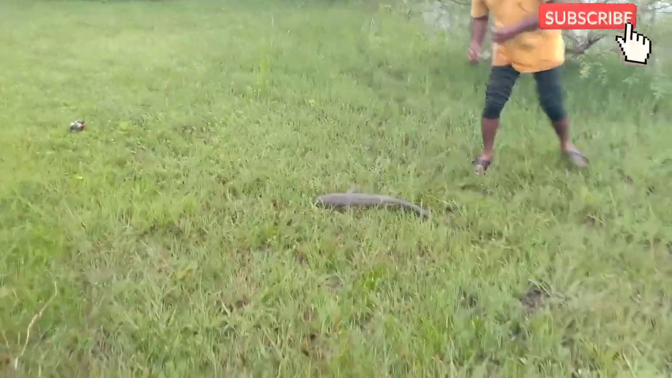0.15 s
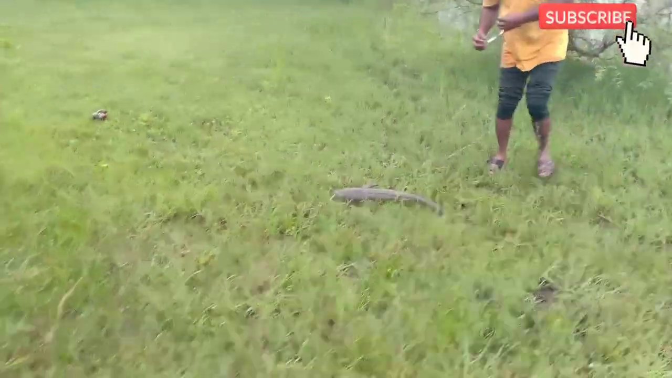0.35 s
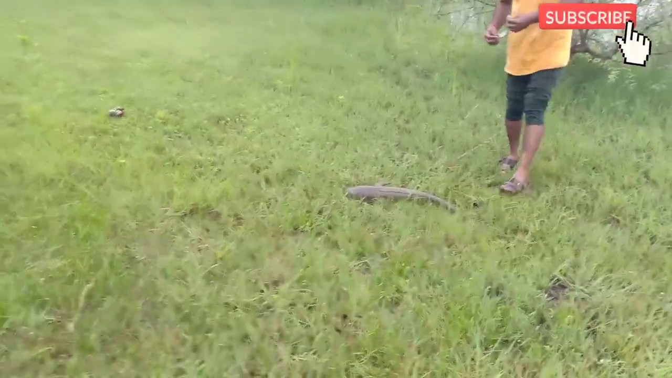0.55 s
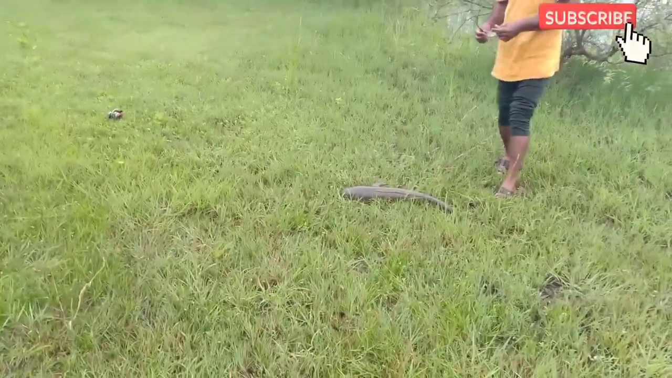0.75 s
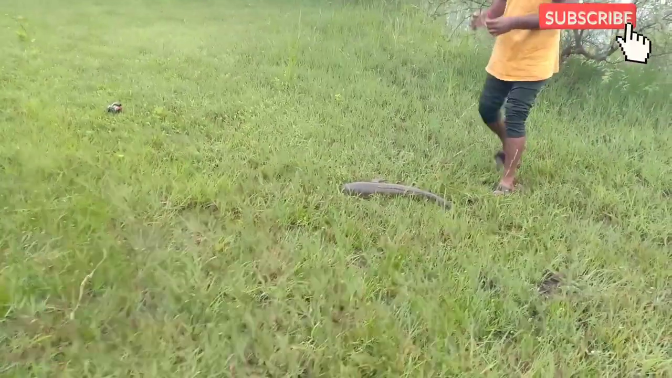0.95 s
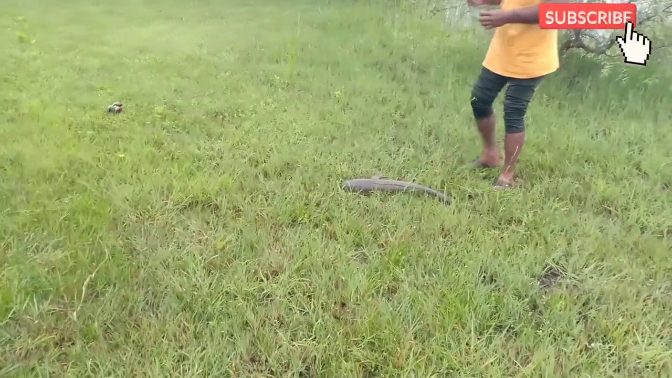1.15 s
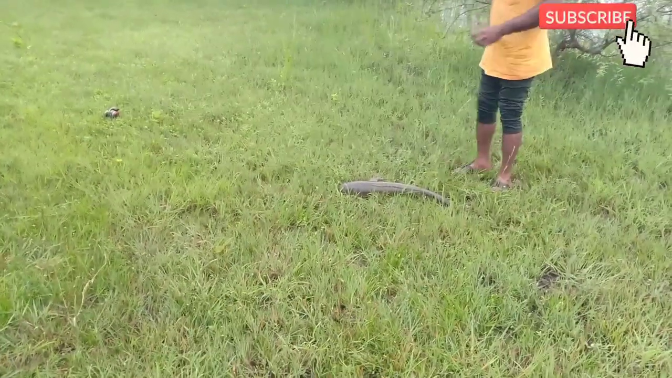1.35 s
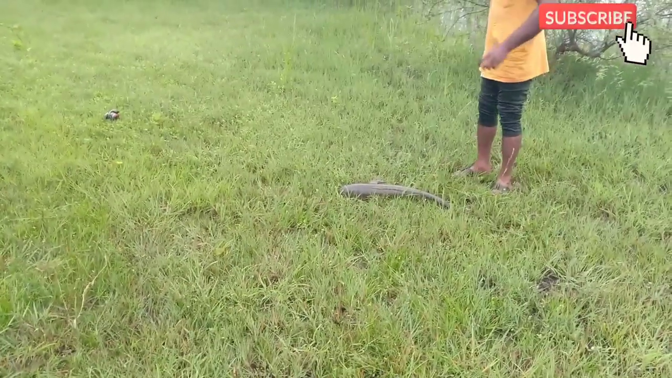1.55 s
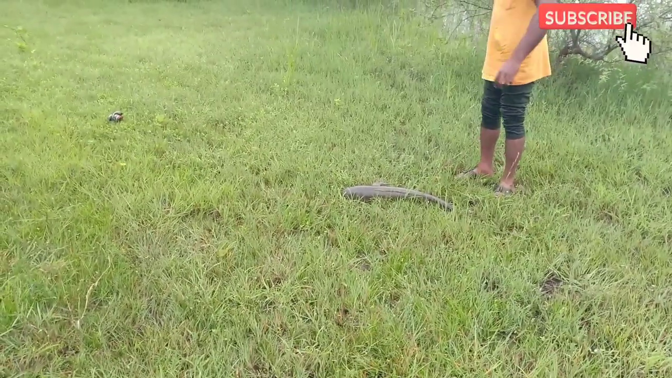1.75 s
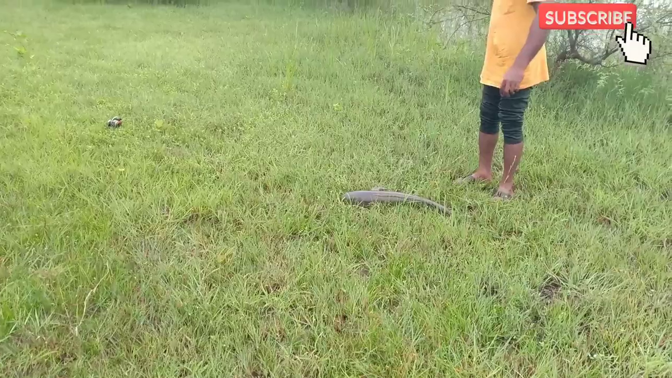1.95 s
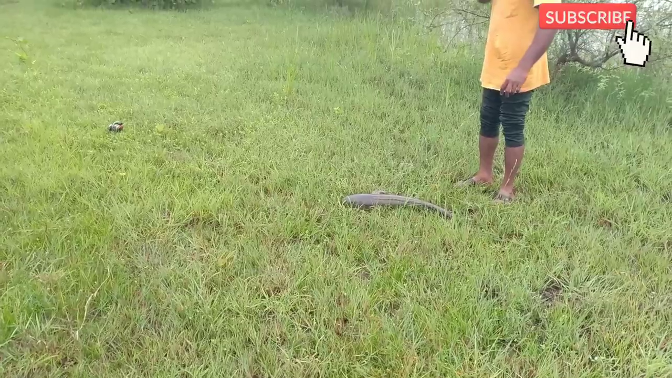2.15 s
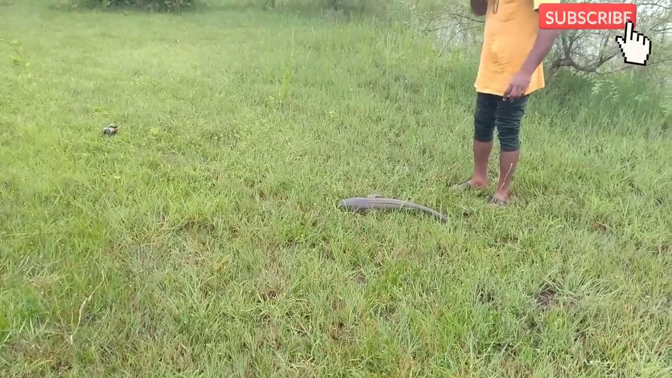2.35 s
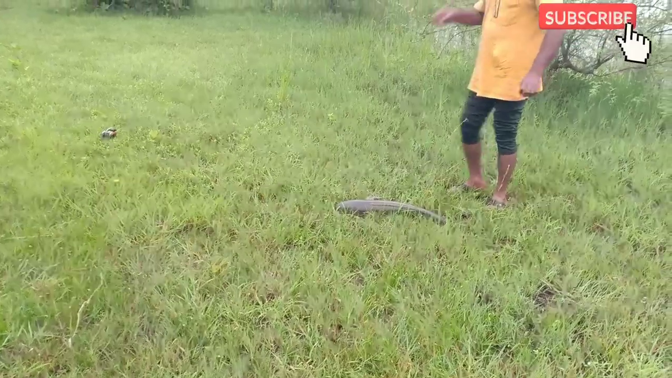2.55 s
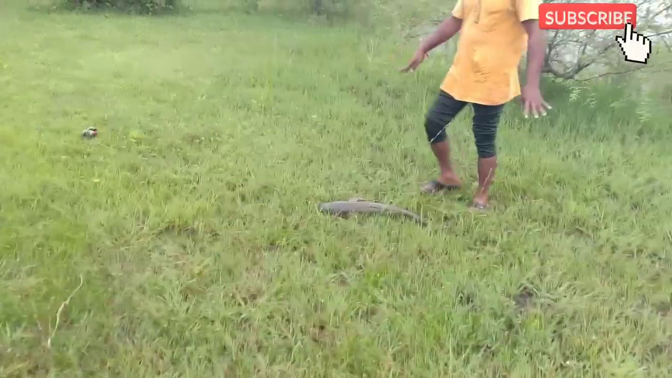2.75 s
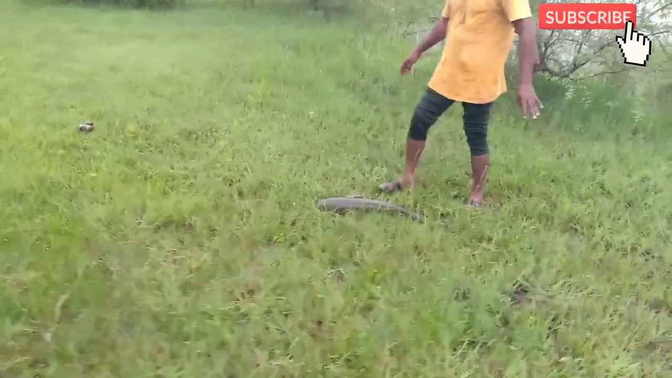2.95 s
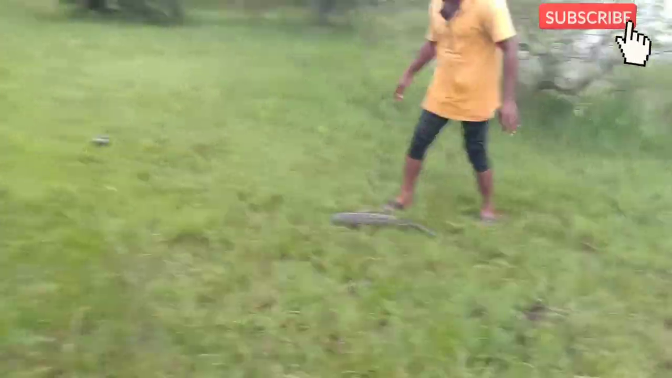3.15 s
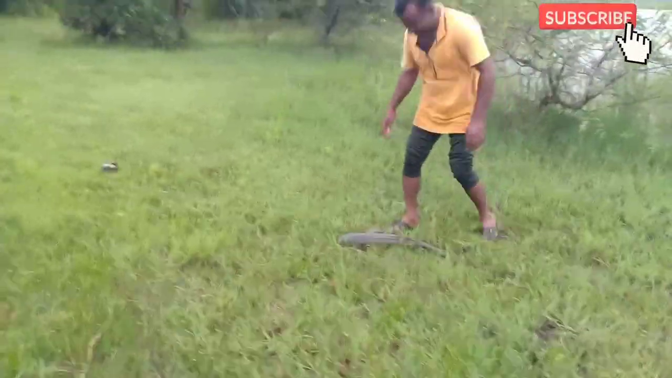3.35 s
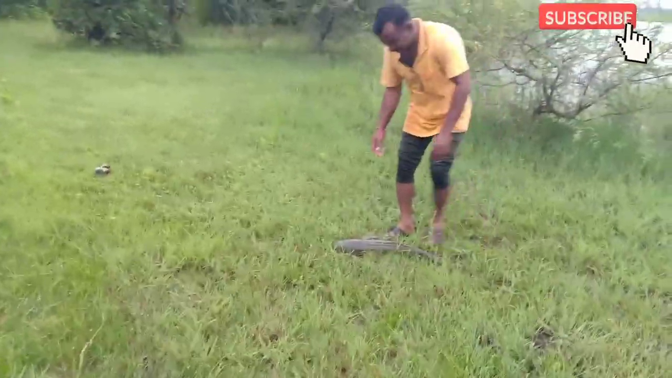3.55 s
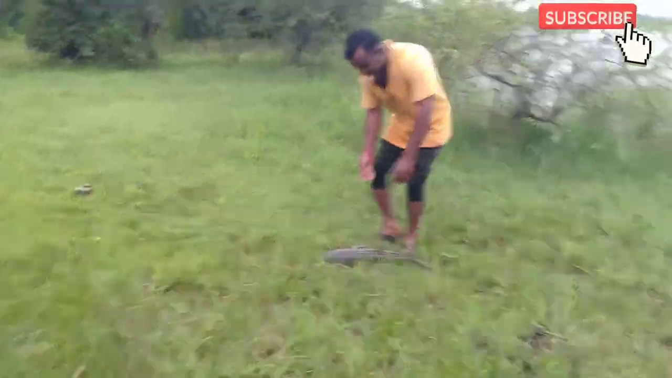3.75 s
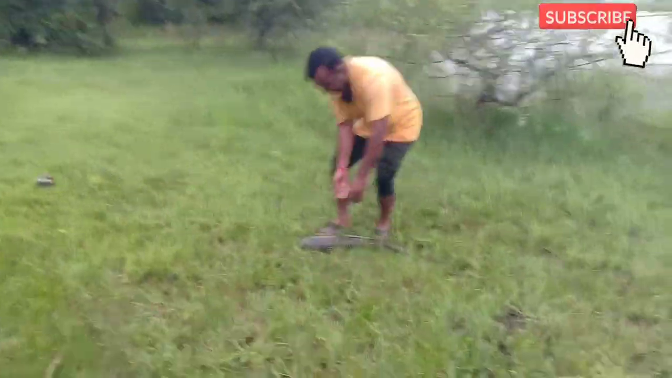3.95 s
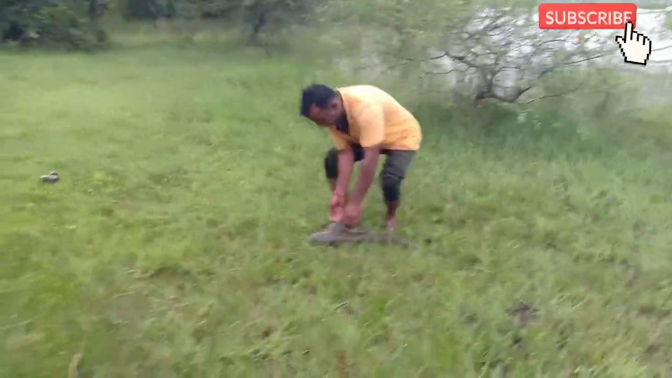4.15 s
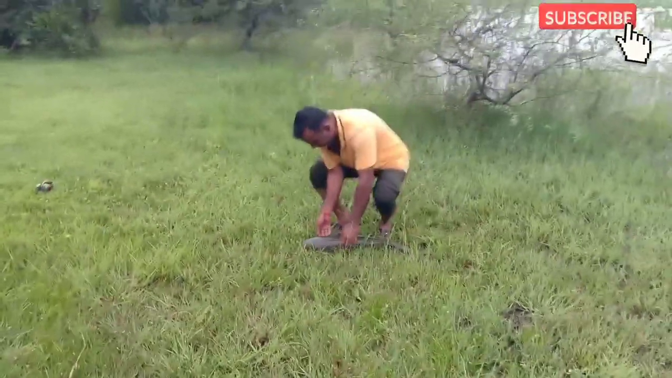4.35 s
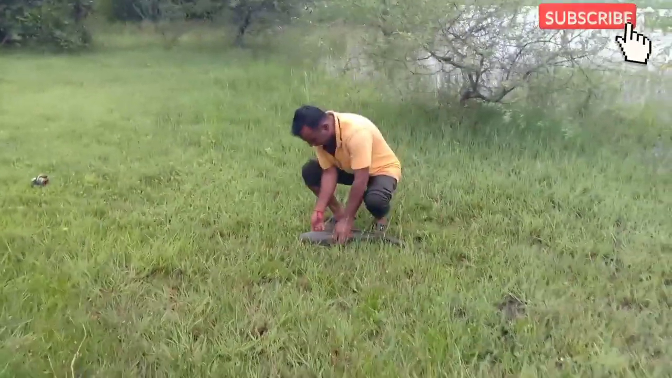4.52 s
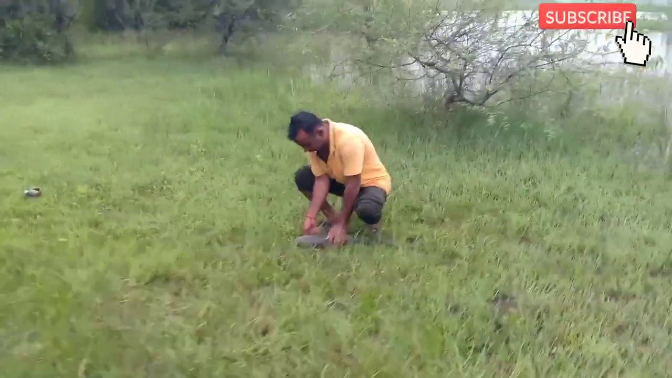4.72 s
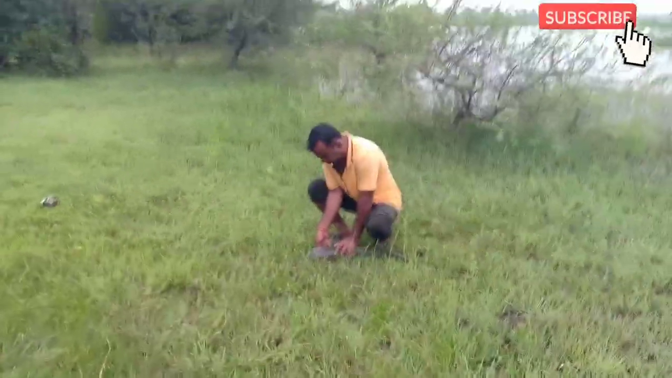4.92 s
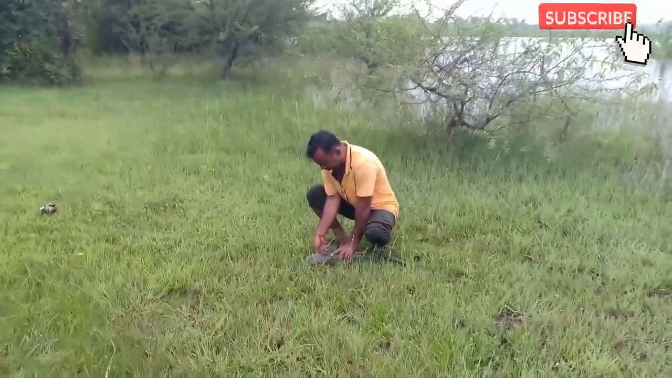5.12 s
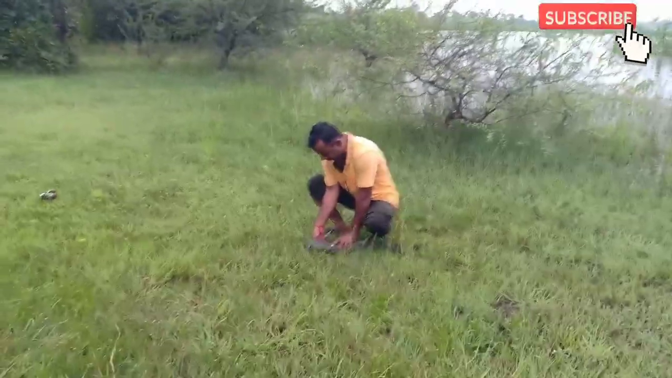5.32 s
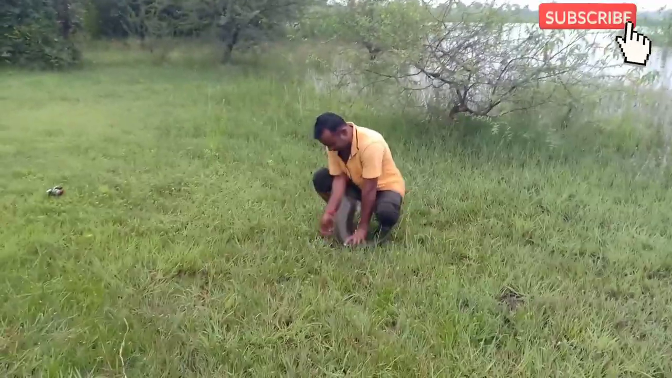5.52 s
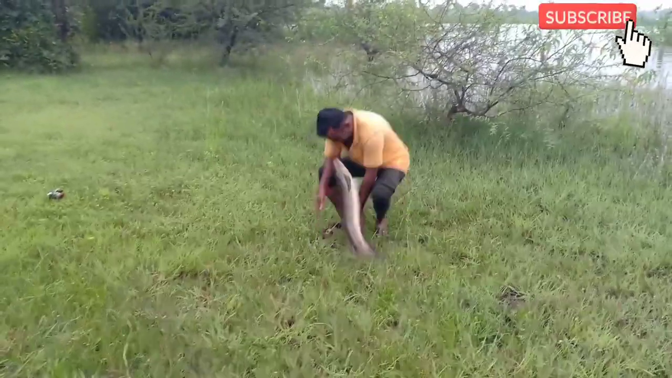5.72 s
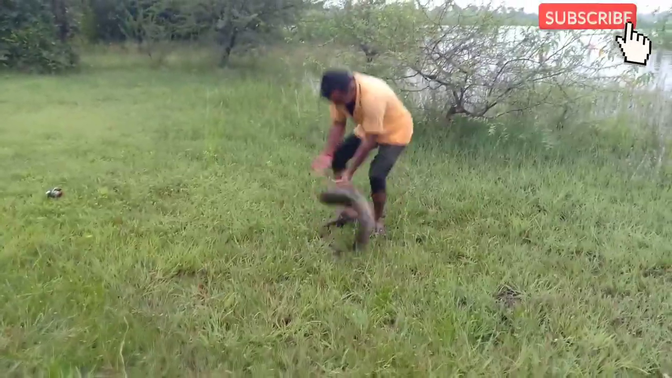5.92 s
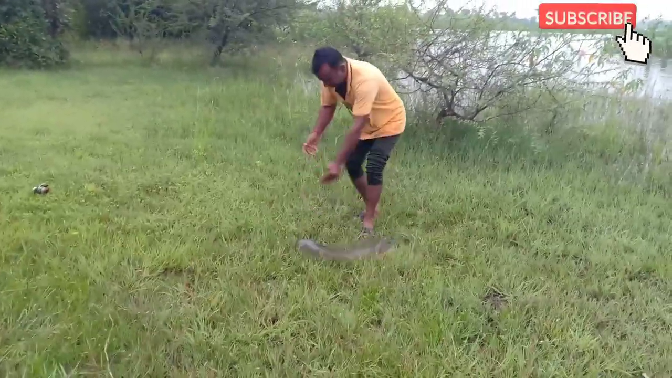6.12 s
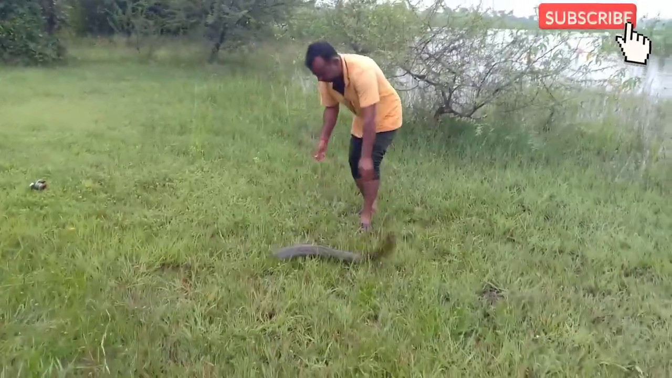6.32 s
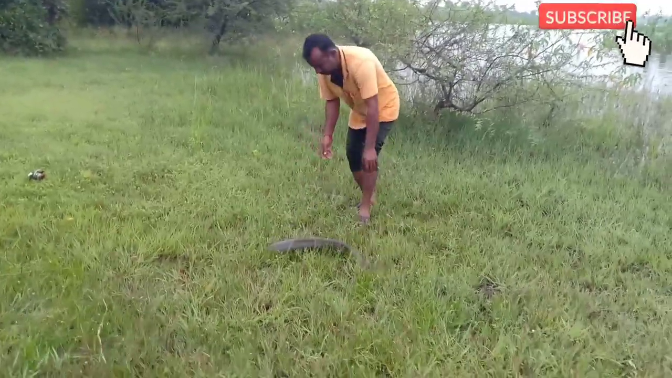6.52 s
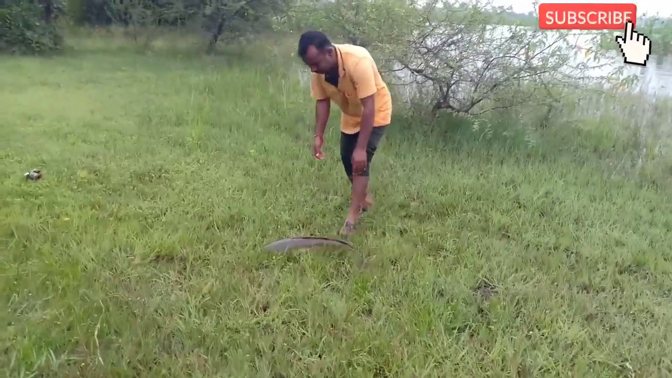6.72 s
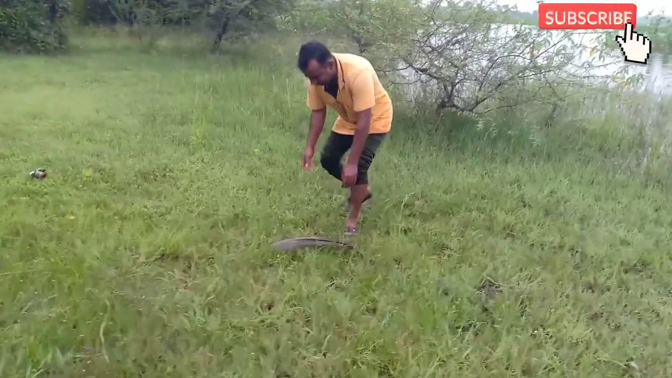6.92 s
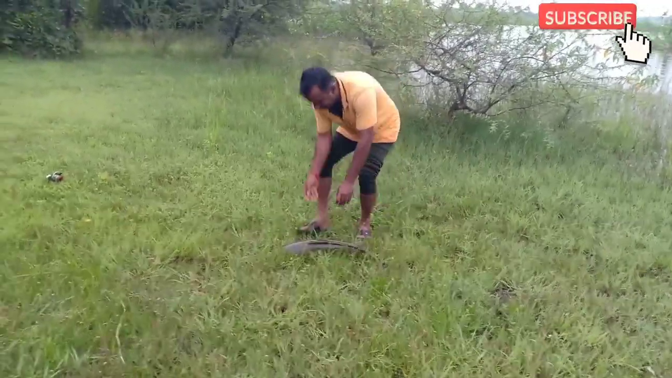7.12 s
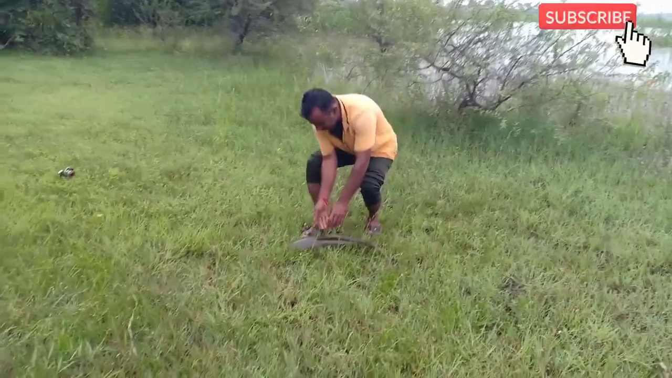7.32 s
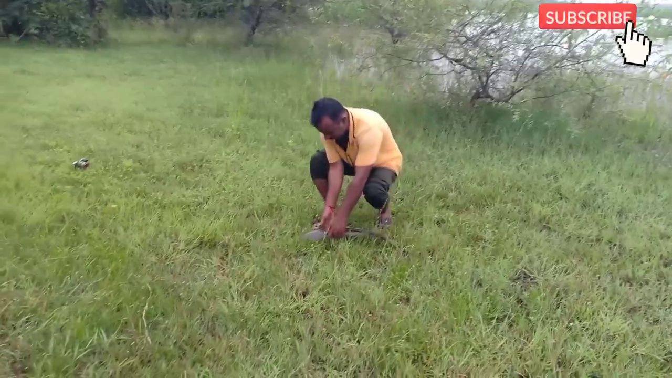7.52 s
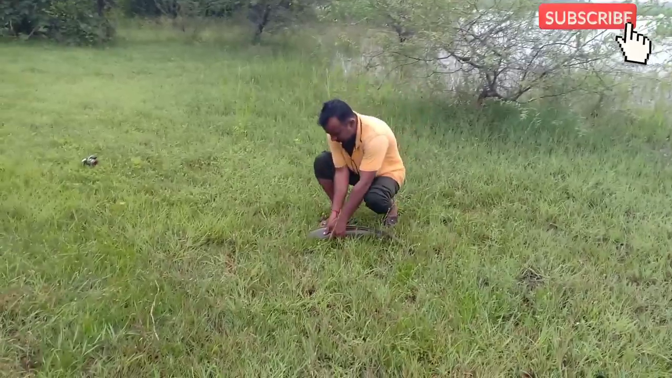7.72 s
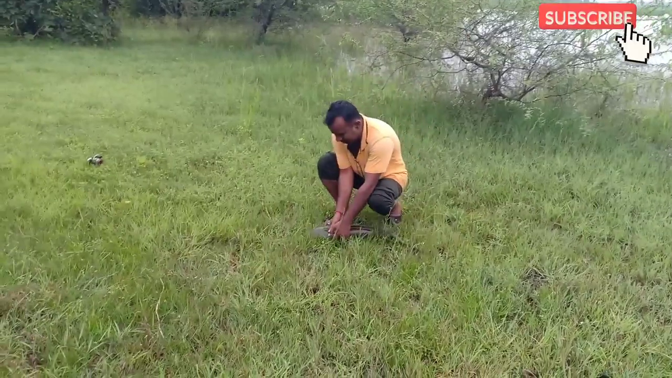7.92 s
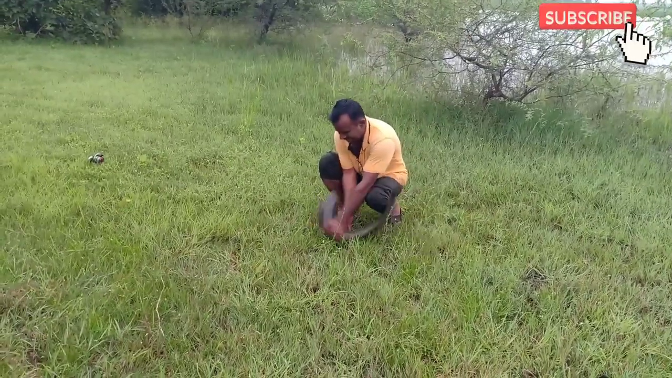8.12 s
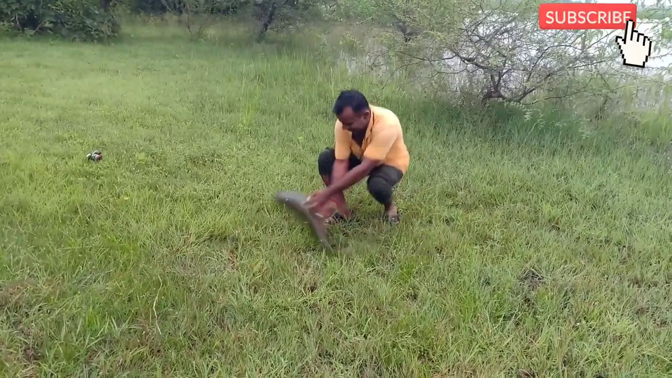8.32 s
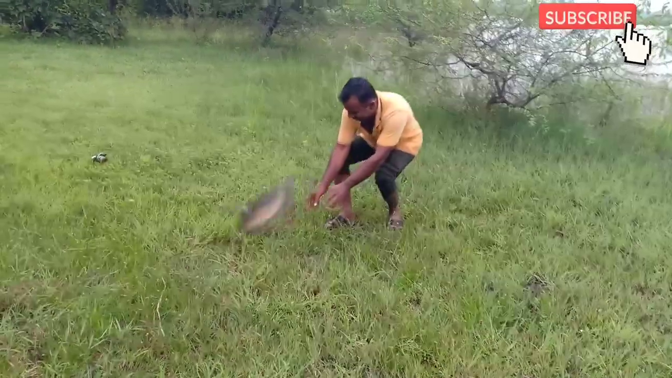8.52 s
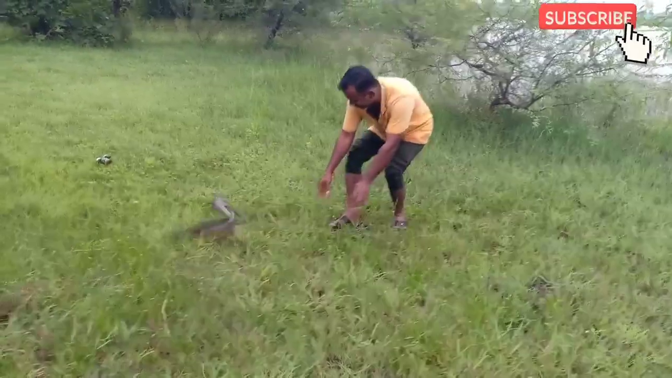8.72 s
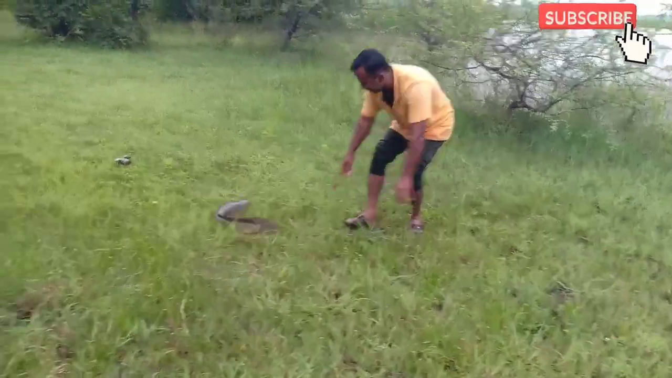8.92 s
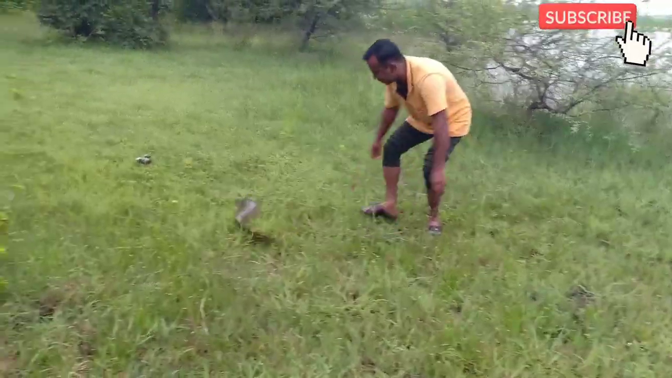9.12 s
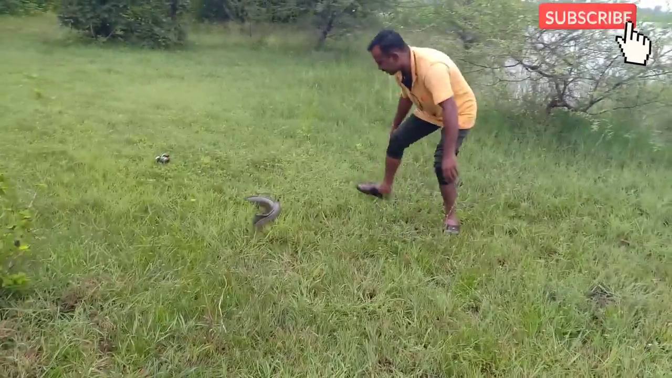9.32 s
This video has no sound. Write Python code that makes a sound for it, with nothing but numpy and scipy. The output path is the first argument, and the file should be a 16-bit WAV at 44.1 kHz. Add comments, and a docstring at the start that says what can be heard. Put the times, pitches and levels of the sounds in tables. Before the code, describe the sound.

A quiet waterside meadow: faint hiss of open air, bird trills, falling whistles and far doves to the left. Someone takes a few dull steps on soft earth, brushing grass and cracking stems. Then a heavy wet fish smacks abruptly, drops and writhes with crunchy, splashy rustles. Birds fill the pause before a second cluster of sharp wet slaps and flops, ending in light grass swishes. Open stereo pickup, little echo, slaps far louder than everything else.

```python
"""Footsteps, rustling grass and snapping stems come first, among bird chatter, whistles and far doves. About
5.5 s in, a wet fish slaps the hands that hold it, drops and writhes in the grass; near 8.1 s it does so again.
Blows, steps and stems are shaped clouds of tiny impacts; bird notes are gliding sines, some blurred by foliage.
A mellow song sounds a few early notes and its main phrase just past the middle. Throughout lie a faint two-tone
drone and an open-air hush of noise."""
import sys
import numpy as np
from scipy import signal
from scipy.fft import rfft, irfft, next_fast_len
from scipy.io import wavfile
from scipy.ndimage import map_coordinates

SR = 44100
rng = np.random.default_rng(int(sys.argv[2]) if len(sys.argv) > 2 else 0)


def output_pcm(signal):
    """Save a mono or channel-first signal as 16-bit PCM at the path in sys.argv[1].

    Samples are clipped to [-1, 1] before scaling.
    """
    pcm = np.clip(np.atleast_2d(signal).T, -1, 1) * 32767
    wavfile.write(sys.argv[1], SR, np.round(pcm).astype(np.int16))


N = 413216

# the body landing and writhing on the turf: start_s, level_db, length_s, body_weight_db
BODY_ROLLS = [(5.599, -43, 0.023, 8), (5.644, -38.5, 0.02, 12), (5.86, -47, 0.021, -1),
              (5.933, -56, 0.028, 18), (6.07, -39, 0.025, 6.5), (6.181, -41, 0.022, 18),
              (8.368, -37.5, .024, 9.5), (8.627, -47.5, 0.017, 20), (8.671, -38.5, 0.023, 16.5)]
# feet and hands brushing through grass: start_s, level_db, length_s
GRASS_STROKES = [(0.784, -55.5, 0.05), (1.07, -65, .06), (1.263, -54, .022), (3.159, -56.5, .045),
                 (3.262, -57, 0.042), (3.417, -62, .07), (3.651, -52.5, 0.019), (3.733, -51, 0.084),
                 (3.951, -55, .1), (4.111, -54.5, .022), (4.629, -53, 0.1), (5.475, -43.5, 0.07),
                 (5.662, -48.5, 0.11), (6.13, -44, 0.076), (6.421, -49.5, 0.041), (7.149, -56, .11),
                 (7.582, -69.5, 0.049), (8.133, -40.5, 0.038), (8.311, -45, 0.035), (8.661, -54.5, 0.076),
                 (8.935, -62, .04), (9.139, -59, .14)]
# tone of soft earth under a blow: frequency_hz, relative_level_db
EARTH_TONE = [(20, -27), (45, -3), (90, -2.5), (130, -10), (220, -25.5), (500, -44), (2000, -50)]


def amp(db):
    """Decibels to gain."""
    return 10 ** (np.asarray(db) / 20)


def unit(x):
    """Scale to rms 1."""
    return x / np.sqrt(np.mean(x ** 2) + 1e-20)


def along(points, hz):
    """Read a curve of (Hz, value) points on a log frequency axis."""
    f, v = np.transpose(points)
    return np.interp(np.log(hz + 1), np.log(f + 1), v)


def add(track, s, sound):
    """Mix a sound into a track from time s on, trimmed to the track."""
    start = round(s * SR)
    lo, hi = max(start, 0), min(start + sound.shape[-1], N)
    if hi > lo:
        track[..., lo:hi] += sound[..., lo - start:hi - start]


def wobble(rate, size):
    """A smooth random curve, rate knots a second."""
    knots = rng.standard_normal(int(size * rate / SR) + 4)
    return map_coordinates(knots, [np.arange(size) * rate / SR])


def filtered(x, gain):
    """Causal (minimum-phase) filter with the given gain over frequency."""
    size = x.shape[-1]
    half = next_fast_len(size // 2 + 2048, real=True)
    wanted = np.maximum(gain(np.fft.rfftfreq(2 * half, 1 / SR)), 1e-6)
    cepstrum = irfft(np.log(wanted))
    cepstrum[1:half] *= 2  # folding the cepstrum forward gives minimum phase
    cepstrum[half + 1:] = 0
    return irfft(rfft(x, 2 * half) * np.exp(rfft(cepstrum)))[..., :size]


def stereo(z, hz, alike):
    """Blend the spectra of two unrelated signals into left and right."""
    likeness = np.clip(along(alike, hz), -.99, .99)
    mid = z[0] * np.sqrt(1 + likeness)
    side = z[1] * np.sqrt(1 - likeness)
    return np.array([mid + side, mid - side])


def noise(colour_db, size):
    """Diffuse stereo noise of rms 1 with the given colour."""
    # open-air stereo width: frequency_hz, left_right_likeness (0-1)
    width = [(30, 0.23), (70, 0.42), (200, 0.27), (600, 0.35), (1200, 0.048), (2400, 0), (4500, 0.2),
             (12000, 0.056)]
    length = next_fast_len(size, real=True)
    hz = np.fft.rfftfreq(length, 1 / SR)
    z = stereo(rfft(rng.standard_normal((2, length))), hz, width)
    return unit(irfft(z * amp(colour_db(hz)), length)[:, :size])


def resonance_db(hz, centre, width):
    """Gain of one resonance, 0 dB at its centre."""
    return 20 * np.log10(hz * width / np.abs(centre ** 2 - hz ** 2 + 1j * hz * width) + 1e-6)


def panned(pair, pan_db):
    """Lean a sound to the left (positive) or right (negative)."""
    return pair * amp([[pan_db / 2], [-pan_db / 2]])


def from_left(pair):
    """The sound reaches the left microphone 0.45 ms before the right."""
    return np.array([pair[0], np.roll(pair[1], round(.00045 * SR))])


def leaning(pair, balance, top_hz):
    """Lean each frequency left or right by a (Hz, left-right dB) curve; nothing passes above top_hz."""
    size = next_fast_len(N + SR // 2, real=True)
    hz = np.fft.rfftfreq(size, 1 / SR)
    gains = amp(np.outer([.5, -.5], along(balance, hz)))
    return irfft(rfft(pair, size) * gains * (hz < top_hz), size)[:, :N]


def scatter(x, t60, colour):
    """Diffuse answer of grass and bushes: a coloured noise tail that loses 60 dB in t60 seconds."""
    t = np.arange(SR // 2) / SR
    tail = noise(lambda hz: along(colour, hz), size=len(t)) * amp(-60 * t / t60)
    return signal.fftconvolve(np.atleast_2d(x), tail / np.linalg.norm(tail[0]), axes=1)[:, :N]


def contact(rise, fall, colour_db, grain_db):
    """A cloud of tiny impacts that swells and dies, rms 1 at its crest; also the time up to the crest."""
    # stereo width of sounds from in front: frequency_hz, left_right_likeness (0-1)
    width = [(35, .4), (70, 0.99), (150, 1), (600, 1), (1200, 0.93), (2400, 0.55), (4500, 0.063),
             (12000, 0.024)]
    lead = 4 * rise
    size = next_fast_len(int((lead + 4 * fall + .03) * SR), real=True)
    t = np.arange(size) / SR - lead
    swell = np.exp(np.minimum(t / rise, -t / fall))
    z = stereo(rfft(swell * rng.standard_normal((2, size))), np.fft.rfftfreq(size, 1 / SR), width)
    impacts = irfft(z / (np.abs(z) + 1e-12), size)  # sharp impacts excite all frequencies alike
    clumps = amp(grain_db * wobble(700, size=size))
    grains = impacts * clumps * np.minimum(1, 4 * swell)
    cloud = filtered(grains, lambda hz: amp(colour_db(hz)))
    return unit(cloud) * np.sqrt(np.mean(swell ** 2)), lead


def fish(s, db, rise, fall, weight_db, spray_db, grain_db):
    """Wet skin meets hands or turf: weight adds bass, spray and grass tilt treble. Gives start and sound."""
    # tone of wet flesh: frequency_hz, relative_level_db
    flesh = [(30, -42), (70, -19), (140, -7), (260, -3.5), (360, -9.5), (500, -0.5), (860, -3.5),
             (1200, -4), (2150, 1.5), (3050, -9.5), (3900, -17.5), (5500, -14), (8000, -34), (14000, -30.5)]
    delay_s = .00166 * rng.uniform(0.844, 1.12)  # the ground's reflection combs each blow differently

    def colour(hz):
        comb = 20 * np.log10(np.abs(1 + 0.204 * np.exp(-2j * np.pi * hz * delay_s)))
        bass = weight_db / (1 + (hz / 330) ** 3)
        treble = spray_db * (1 - 1 / (1 + (hz / 4500) ** 3))
        return along(flesh, hz) + bass + treble + comb

    blow, lead = contact(rise, fall, colour, grain_db)
    return s - lead, amp(db) * blow


def slaps():
    """Short square blows are dull smacks; longer glancing ones splash. The body's mass adds a low push."""
    # wet blows of the fish: start_s, level_db, contact_length_s, body_weight_db
    blows = [(5.4795, -5.5, .0016, -4.5), (5.5315, -38, .0016, 0), (5.921, -40.5, .004, 12),
             (5.986, -45, .002, 19.5), (6.158, -18.5, .001, -2), (6.161, -24, 0.002, -9),
             (6.169, -34.5, 0.011, 2), (8.1381, -23, 0.003, 4), (8.1444, -11.5, .0022, 0),
             (8.1486, -21, 0.0016, -11), (8.1983, -30, 0.0022, -11), (8.3547, -21, .0034, 2),
             (8.3579, -25, .0034, 2), (8.4905, -33, .0045, 17), (8.504, -33.5, .003, -23),
             (8.677, -41, .004, 9), (8.692, -48, 0.0022, 11)]
    spray_from_s, spray_db_per_doubling, spray_most_db = 0.0023, 22, 13.5
    thud_hz, thud_fall_s, thud_db = 106.6, 0.007, -30.5  # thud_db is relative to level plus weight
    out = np.zeros((2, N))
    t = np.arange(SR // 10) / SR
    push = t / thud_fall_s * np.exp(1 - t / thud_fall_s)
    thud = np.sin(2 * np.pi * thud_hz * t) * push
    for s, db, length, weight_db in blows:
        # a longer, glancing blow throws more spray
        spray_db = min(spray_most_db, spray_db_per_doubling * np.log2(length / spray_from_s))
        add(out, *fish(s, db, .52 * length, length, weight_db, spray_db, grain_db=0))
        add(out, s - length, amp(db + weight_db + thud_db) * thud)
    return out


def flops():
    """The body rolls onto the turf in a slower, grainier swell, bright with crushed grass."""
    out = np.zeros((2, N))
    for s, db, length, weight_db in BODY_ROLLS:
        add(out, *fish(s, db, 1.15 * length, .88 * length, weight_db, spray_db=15.5, grain_db=2.5))
    return out


def strokes(rows, spectrum, grain_db):
    """Soft contacts with one kind of ground; rows are (s, level dB, rise s, fall s)."""
    out = np.zeros((2, N))
    for s, db, rise, fall in rows:
        stroke, lead = contact(rise, fall, lambda hz: along(spectrum, hz), grain_db)
        add(out, s - lead, amp(db) * stroke)
    return out


def landings(rise_s=.008, fall_s=.014):
    """The earth gives a deep, dull thump under the whole weight of the falling fish."""
    # the fish hits the earth: start_s, level_db
    drops = [(6.177, -54), (8.497, -60)]
    return strokes([(s, db, rise_s, fall_s) for s, db in drops], EARTH_TONE, grain_db=0)


def footsteps():
    """Each step is a short heel thud inside the softer press of the sole taking the weight."""
    # heels on soft earth: start_s, level_db
    steps = [(0.054, -55.5), (0.829, -58), (1.15, -52), (1.208, -47), (1.468, -48), (3.693, -43.5),
             (3.821, -51)]
    heel_rise_s, heel_fall_s = .006, 0.0069
    sole_db, sole_lag_s, sole_rise_s, sole_fall_s = -13, 0.0123, 0.022, 0.038  # level relative to the heel
    heels = [(s, db, heel_rise_s, heel_fall_s) for s, db in steps]
    soles = [(s + sole_lag_s, db + sole_db, sole_rise_s, sole_fall_s) for s, db in steps]
    return strokes(heels + soles, EARTH_TONE, grain_db=0)


def swishes():
    """Blades of grass bend aside and spring back: grainy swells in the tone of grass."""
    # tone of brushed grass: frequency_hz, relative_level_db
    grass = [(100, -13.5), (350, -14.5), (580, -7), (1000, -12.5), (1600, -7), (2250, 0.5), (3400, -13.5),
             (5300, -11), (8000, -25), (15000, -20)]
    return strokes([(s, db, length, 1.05 * length) for s, db, length in GRASS_STROKES], grass, grain_db=3)


def small_stems(count=6):
    """Faint snaps at chance moments around every swish and flop, stronger under a stronger stroke."""
    stem_hz, pitch_log_spread = 2420, 0.24
    level_db, vary_db, crack_db = -7, 3, -9.5  # level relative to the stroke, crack relative to the ring
    rows = []
    for s, db, length, *_ in GRASS_STROKES + BODY_ROLLS:
        for when, loud, pitch in rng.standard_normal((count, 3)):
            start = s + length * np.tanh(when)
            rows.append((start, db + level_db + vary_db * loud, stem_hz * np.exp(pitch_log_spread * pitch), crack_db))
    return rows


def snaps(fall_cycles=4, relative_width=0.23):
    """Each snap of a stem or wet skin is a broad crack and a few cycles in one resonance."""
    # the loudest snaps: start_s, level_db, pitch_hz, crack_relative_to_ring_db
    loud_snaps = [(1.268, -48, 2700, -16), (3.245, -47, 2000, -12), (3.352, -39.5, 1870, -22),
                  (3.3782, -41, 2100, -19), (3.416, -44, 2140, -24), (3.4688, -45, 1950, -18),
                  (3.558, -52.5, 617, -12), (3.735, -41, 2540, -19.5), (3.754, -40, 2600, -6),
                  (3.946, -50, 1000, -6), (4.656, -34, 2480, -5), (5.066, -37, 3840, 0),
                  (5.481, -20.5, 3507, -19.5), (5.518, -29.5, 5270, -25.5), (5.6988, -33, 5330, -14),
                  (5.71, -48, 5200, -24.5), (6.011, -40, 2000, -17), (6.059, -38, 1860, -20),
                  (6.064, -32, 1950, -26), (6.087, -32, 2250, -13), (6.121, -39, 2540, -18),
                  (6.159, -31, 466, -26), (6.166, -26.5, 5550, -10), (6.193, -41, 2160, -8),
                  (6.389, -39, 4870, -10), (7.677, -34.5, 2470, -10.5), (8.124, -38.5, 2050, -21),
                  (8.1465, -14, 2880, -17), (8.345, -27.5, 5735, -12), (8.354, -28.5, 613, -22),
                  (8.407, -44, 2050, -4), (8.571, -47.5, 940, -6), (8.654, -49, 2000, -12),
                  (8.69, -41, 1090, -10), (9.095, -45, 536, -25)]
    # treble trim: frequency_hz, gain_db
    treble = [(6300, 0.5), (8000, -6), (15000, -5)]
    out = np.zeros((2, N))
    for s, db, pitch, crack_db in loud_snaps + small_stems():
        def colour(hz):
            ring = 2 * resonance_db(hz, pitch, relative_width * pitch)
            crack = resonance_db(hz, pitch, pitch) + crack_db
            return np.maximum(ring, crack) + along(treble, hz)

        snap, lead = contact(.0003, max(fall_cycles / pitch, .0012), colour, grain_db=0)
        add(out, s - lead, amp(db) * snap)
    return out


def sung(pitch, flutter_db, flutter_rate):
    """One bird note of rms 1: a sine follows the pitch curve under a rounded, fluttering swell."""
    u = np.linspace(0, 1, len(pitch))
    shape = np.sqrt(np.abs(np.sin(np.pi * u))) * amp(flutter_db * wobble(flutter_rate, size=len(u)))
    return unit(shape * np.sin(2 * np.pi * np.cumsum(pitch) / SR))


def slurs(rows, waver, flutter_db):
    """Nearly pure bird notes on a bowed glide; rows are (s, length s, Hz, fall, arch, dB)."""
    out = np.zeros(N)
    for s, length, hz, fall, arch, db in rows:
        u = np.linspace(0, 1, int(length * SR))
        glide = fall * (.5 - u) - arch * (2 * u - 1) ** 2
        pitch = hz * (1 + glide + waver * wobble(148.5, size=len(u)))
        add(out, s, amp(db) * sung(pitch, flutter_db, flutter_rate=52.6))
    return out


def chatter(depth=0.1624, droop=0.043, rate=42, rasp=0.013, vary_db=1.0, flutter_db=3.5):
    """Each note is a fast trill whose pitch zigzags, starting upwards, no two quite alike."""
    # the nearest warbled notes: start_s, level_db (before the bird mix), middle_hz, length_s
    near_notes = [(0.159, -62.5, 4450, 0.04), (.337, -62, 4500, 0.059), (.715, -55.5, 4650, .048),
                  (0.813, -60.5, 4700, 0.028), (1.076, -57, 4600, .068), (1.819, -59, 4550, 0.047),
                  (2.049, -63, 4900, 0.052), (2.803, -61, 4820, 0.08), (2.942, -64, 4690, .05),
                  (3.384, -66, 4500, .06), (3.475, -61, 4800, 0.056), (4.207, -65.5, 5400, .08),
                  (4.37, -61.5, 5200, 0.068), (4.51, -62, 4500, 0.078), (4.762, -62, 4500, .075),
                  (4.953, -62, 4500, 0.058), (6.597, -60, 4300, 0.064), (7.005, -62.5, 4330, 0.063),
                  (7.077, -61.5, 4400, 0.061), (7.276, -58, 4350, 0.05), (7.407, -62, 4250, 0.051),
                  (7.645, -60.5, 4350, 0.081), (7.867, -62, 4350, 0.096), (8.737, -58, 4450, 0.058),
                  (9.04, -69, 4650, .03), (9.321, -61.5, 4550, .06)]
    faint_per_s, faint_db, faint_hz, faint_s = 1.6, -71, 4550, 0.058  # answers from farther bushes
    faint = [((k + rng.random()) / faint_per_s, faint_db, faint_hz, faint_s)
             for k in range(int(faint_per_s * N / SR))]
    out = np.zeros(N)
    for s, db, centre_hz, length in near_notes + faint:
        u = np.linspace(0, 1, int(length * SR))
        cycles = u * length * rate * amp(vary_db * rng.normal())
        swing = signal.sawtooth(2 * np.pi * cycles + np.pi / 4, .5)
        pitch = centre_hz * (1 + depth * swing + droop * (.5 - u) + rasp * wobble(896, size=len(u)))
        add(out, s, amp(db) * sung(pitch, flutter_db, flutter_rate=92))
    return out


def whistles():
    """One bird repeats a thin falling call; others slur high wavering notes."""
    # the falling call: start_s, level_db (before the bird mix)
    call_times = [(-.052, -60), (1.595, -65), (2.09, -65)]
    # thin high notes: start_s, length_s, middle_hz, fall and arch (shares of pitch), level_db (before the mix)
    high_notes = [(.83, 0.19, 4830, .085, 0.025, -59.5), (1.45, 0.029, 4800, 0.23, 0.0044, -68),
                  (2.518, 0.034, 5900, .24, 0.004, -62.5), (2.55, 0.23, 5450, 0.027, 0.013, -66.5),
                  (2.71, 0.074, 4650, 0.16, 0, -63), (2.77, 0.074, 4400, 0, -0.00082, -59),
                  (2.81, 0.056, 3990, 0.14, 0.0029, -66), (2.85, .09, 4370, 0, 0, -66),
                  (1.54, .035, 4620, 0, 0.0031, -61), (1.59, 0.039, 5540, .2, 0, -62),
                  (4.83, .11, 5210, 0.013, .055, -68), (7.24, 0.027, 5950, 0.17, -0.0042, -65),
                  (7.595, .035, 5750, .15, -.02, -63)]
    call_s, call_hz, call_fall, call_arch = .2, 4140, 0.38, -0.05  # fall and arch are shares of pitch
    calls = [(s, call_s, call_hz, call_fall, call_arch, db) for s, db in call_times]
    return slurs(calls, waver=0.011, flutter_db=4) + slurs(high_notes, waver=0.007, flutter_db=3.5)


def singer():
    """Mellow slurs: near ones arrive as clean glides, far ones as a blur through the leaves."""
    # deeper in the bushes: start_s, length_s, middle_hz, fall and arch (shares of pitch),
    # level_db (before the clear/blurred split), clearness (0-1)
    song = [(4.888, 0.12, 2533, 0.24, -0.0072, -54.5, 0.88), (5.06, .08, 2570, 0.074, -0.0042, -63, .15),
            (5.12, .07, 2490, 0.19, -0.0091, -59.5, .4), (5.195, .07, 2490, 0.36, 0.002, -58.5, 0.44),
            (5.67, 0.047, 2477, 0, -0.0025, -56, 0.65), (5.87, 0.091, 2406, -0.012, -0.038, -59.5, 0.65),
            (6.26, 0.18, 2620, .28, .01, -59.5, .7), (6.43, 0.128, 2440, 0.11, 0, -58, .45),
            (6.665, 0.086, 2894, 0, 0.0048, -59, 0.9), (6.86, .048, 2463, .01, 0.0049, -55, 0.77),
            (6.894, 0.059, 2260, 0.18, -.025, -52, 0.94), (6.912, 0.053, 2920, .03, 0, -60, 0.76),
            (7.09, 0.14, 2400, 0.015, 0, -62, .2), (7.545, 0.047, 2040, 0.113, 0, -63, .4),
            (.828, 0.03, 2560, -0.0076, 0.0021, -58.5, .95), (.99, .12, 2000, .03, -0.0028, -69.5, 0.27),
            (1.135, .04, 2200, -0.031, 0.0053, -62.5, .9), (1.55, 0.057, 2165, -0.017, -0.0039, -63, .4),
            (1.695, .022, 2350, .2, 0, -60, .95), (2.333, .022, 2600, .25, 0, -64, 1)]
    direct, blurred = [], []
    for *note, db, clear in song:
        clear = np.clip(clear, .01, .99)
        direct.append((*note, db + 20 * np.log10(clear)))
        blurred.append((*note, db + 10 * np.log10(1 - clear ** 2)))
    leaves = [(500, -1.5), (3000, 3.0), (10000, -11.5)]  # (Hz, dB)
    haze = scatter(slurs(blurred, waver=.03, flutter_db=4), t60=0.27, colour=leaves)
    return slurs(direct, waver=0.0052, flutter_db=4) + amp(-2.5) * haze


def twitter(spread=0.1, glide=0.0616):
    """Faint short notes at chance times and pitches, mostly falling."""
    # birds farther off: from_s, to_s, centre_hz, notes_per_s, middle_level_db (before the bird mix)
    flocks = [(0, 9, 5100, 14, -73.5), (.65, 1.9, 5000, 45, -70.5), (0, 9.7, 2380, 14, -71),
              (.7, 1.25, 2150, 45, -71), (1.5, 1.6, 2700, 40, -70.5)]
    notes = []
    for begin, end, centre, rate, db in flocks:
        for k in range(int(rate * (end - begin))):
            pitch, slope, arch, loud = rng.standard_normal(4)
            start, length = begin + (k + rng.random()) / rate, rng.uniform(0.0245, .08)
            hz, fall = centre * np.exp(spread * pitch), glide * (2 * slope + 1)
            notes.append((start, length, hz, fall, glide * arch / 2, db + loud))
    return slurs(notes, waver=0.015, flutter_db=10.5)


def doves(arch=0.0208):
    """Soft, mostly sinking coos from far to the left, bowed up in the middle by a share of their pitch."""
    # distant doves: start_s, length_s, pitch_hz, fall (share of pitch), level_db (before the bird mix)
    coo_notes = [(0, .14, 680, 0.024, -69), (.87, 0.15, 668, 0.037, -68), (2.127, 0.11, 650, -0.061, -69),
                 (2.228, 0.25, 695, 0.053, -69), (2.348, 0.49, 636, .07, -70),
                 (3.189, 0.53, 628, 0.09, -66.5), (4.03, 0.54, 640, 0.037, -71.5),
                 (4.92, 0.17, 667, 0.003, -70), (7.17, 0.14, 552, -0.015, -66.5),
                 (7.449, 0.33, 560, 0.023, -63), (8.977, 0.33, 544, 0.031, -63.5)]
    rows = [(s, length, hz, fall, arch, db) for s, length, hz, fall, db in coo_notes]
    coos = slurs(rows, waver=0.016, flutter_db=2)
    return from_left([coos, coos])


def birds():
    """Songbirds roughened by nearby twigs, the farthest heard only through foliage, and doves beyond."""
    clear, trills = whistles(), chatter()
    leaves = [(500, 1.0), (2400, -1.5), (5000, 1.5), (10000, -6.5)]  # (Hz, dB)
    direct = panned(amp(-2) * clear + amp(-3) * trills + amp(-.5) * doves(), pan_db=-1)
    twigs = scatter(amp(-5.5) * trills + amp(-13.5) * clear, t60=.06, colour=leaves)
    foliage = scatter(amp(-11.5) * (clear + trills) + amp(-1.5) * twitter(), t60=0.2, colour=leaves)
    return direct + singer() + twigs + foliage


def drone(waver=0.01, flutter_rate=9):
    """Two narrow tones from far to the left waver and keep fading in and out."""
    # level and pitch over time: time_s, lower_level_db, upper_level_db, upper_pitch_hz
    fades = [(0, -93, -78, 262), (1.9, -77, -82.5, 262), (2.7, -76, -73, 263), (3.7, -86, -76, 262),
             (5, -88, -80, 266), (6.4, -81.5, -77, 270), (7.05, -87, -69, 270), (7.4, -83, -77, 275),
             (9.37, -86, -77.5, 270)]
    s, *columns = np.transpose(fades)
    low_db, high_db, high_hz = [np.interp(np.arange(N) / SR, s, column) for column in columns]
    out = np.zeros(N)
    for hz, db in (185, low_db), (high_hz, high_db):
        phase = 2 * np.pi * np.cumsum(hz * (1 + waver * wobble(11, size=N))) / SR
        sine = wobble(flutter_rate, size=N) * np.sin(phase)
        cosine = wobble(2 * flutter_rate, size=N) * np.cos(phase)
        out += amp(db) * unit(sine + cosine)
    return from_left([out, out])


def open_air(drift_db=3.0):
    """A broad hush of noise with a few slowly drifting bands of far-off din."""
    # hush over time: time_s, level_db (before a 1 dB cut)
    hush = [(0.0, -56.5), (2.56, -59), (3.83, -54.5), (4.18, -58), (5.4, -57.5), (5.56, -54.5),
            (7.93, -59.5), (8.3, -53), (8.92, -55), (9.37, -58.5)]
    # colour of the hush: frequency_hz, relative_level_db
    air = [(15, -11), (60, 3.5), (130, 4), (420, 1.5), (650, 1.5), (1350, -1.5), (2500, 4.5), (3300, -2.5),
           (4600, 0), (6900, -2), (7800, -7.5), (10000, -2), (11500, -16.5), (15500, -10.5)]
    # distant din: centre_hz, width_hz, middle_level_db
    din = [(638, 169, -71.5), (2403, 2500, -72), (6890, 350, -72)]
    level_db = np.interp(np.arange(N) / SR, *np.transpose(hush))
    out = amp(level_db - 1) * from_left(noise(lambda hz: along(air, hz), size=N))
    for centre, width, db in din:
        band = noise(lambda hz: 2 * resonance_db(hz, centre, width), size=N)
        out += amp(db + drift_db * wobble(3.7, size=N)) * from_left(band)
    return out


def scene():
    """Fish and man on the grass with its diffuse answer, birds, drone and open air around them."""
    # stereo lean of sounds from in front: frequency_hz, left_minus_right_db
    front = [(100, 3.5), (500, -0.5), (1100, 2), (2300, 2), (4500, 0.5), (12000, 2.5)]
    near = slaps() + flops() + landings() + footsteps() + swishes() + snaps()
    turf = [(150, -1.5), (550, -8), (1000, -5.0), (2200, -6.5), (3500, -4), (5500, 2.0), (14000, -17.0)]  # (Hz, dB)
    ground = scatter(near, t60=0.12, colour=turf)
    return leaning(near, front, SR / 2) + amp(-14.0) * ground + birds() + drone() + open_air()


def record(dry):
    """Two slightly unlike microphones, a band limit and a small constant offset."""
    # difference between the microphones: frequency_hz, left_minus_right_db
    ports = [(60, -1), (200, -3.5), (520, -2), (1200, -0.5), (2400, 1), (4300, -3), (7000, -1.5),
             (15000, -0.5)]
    return leaning(dry, ports, top_hz=15750) + .001


dry = scene()
out = record(dry)
output_pcm(out)
```